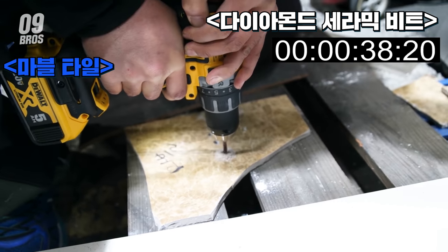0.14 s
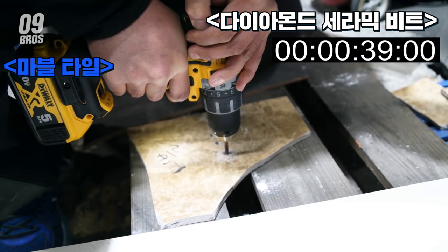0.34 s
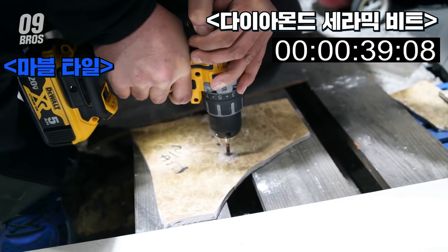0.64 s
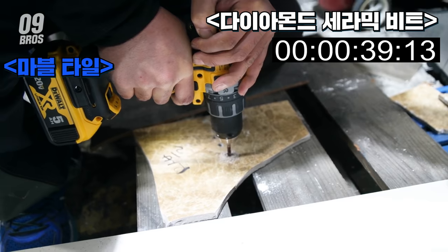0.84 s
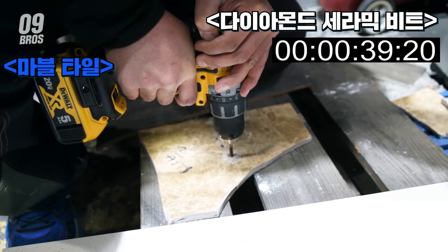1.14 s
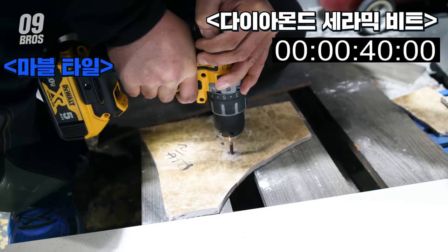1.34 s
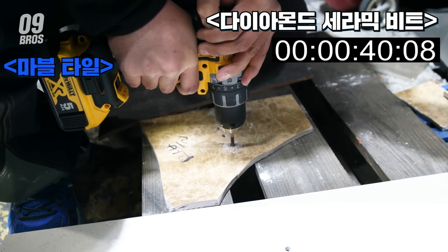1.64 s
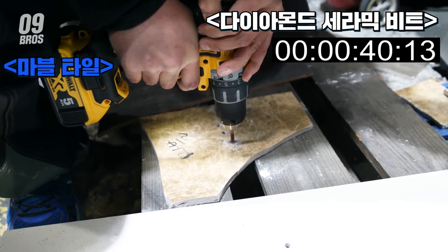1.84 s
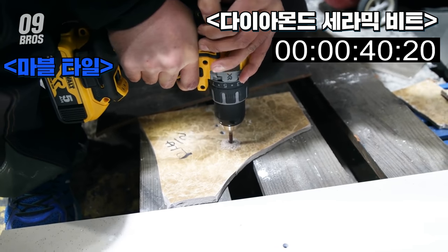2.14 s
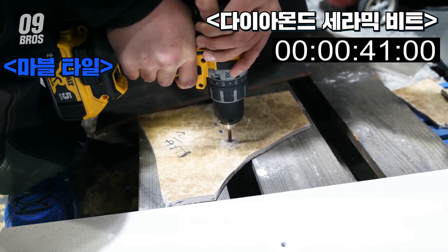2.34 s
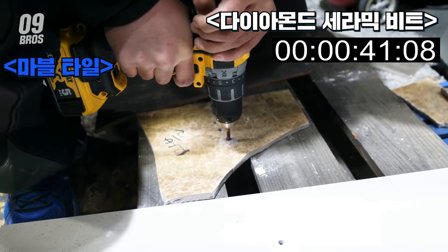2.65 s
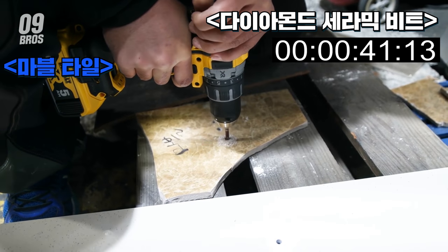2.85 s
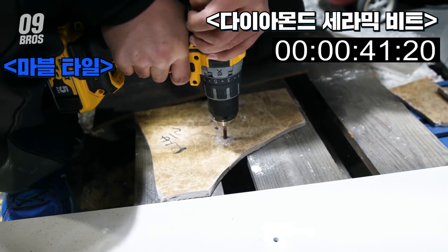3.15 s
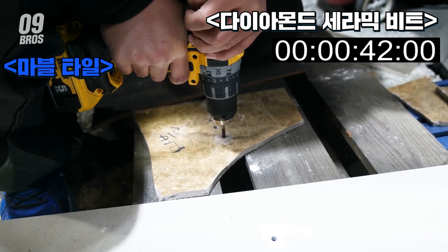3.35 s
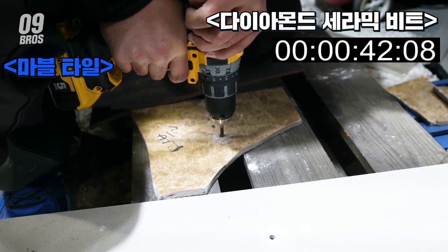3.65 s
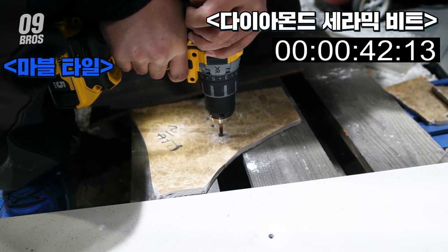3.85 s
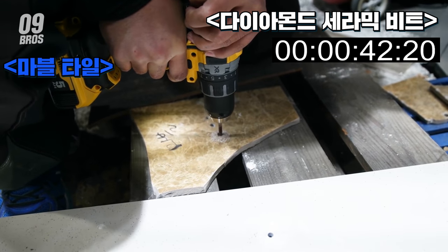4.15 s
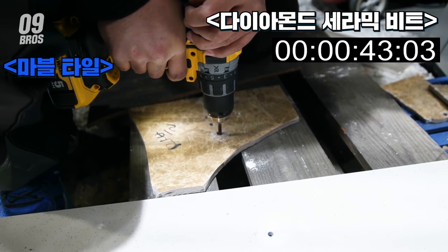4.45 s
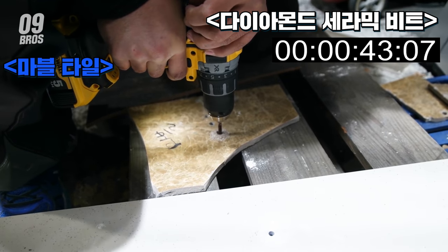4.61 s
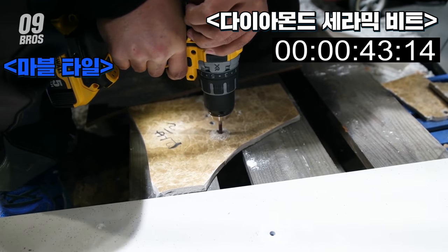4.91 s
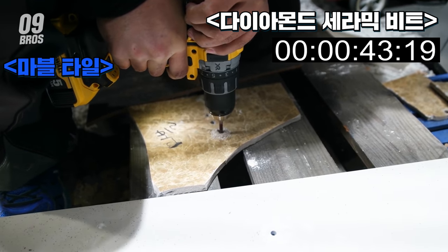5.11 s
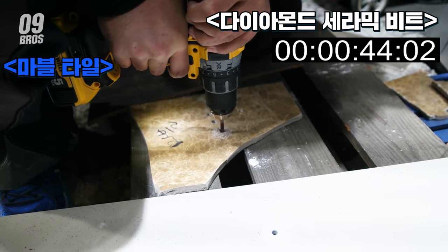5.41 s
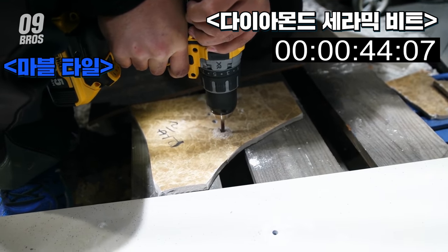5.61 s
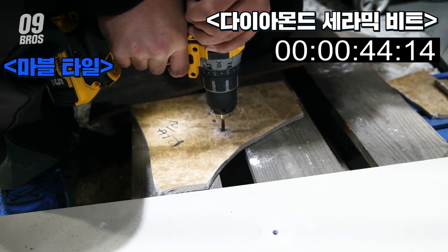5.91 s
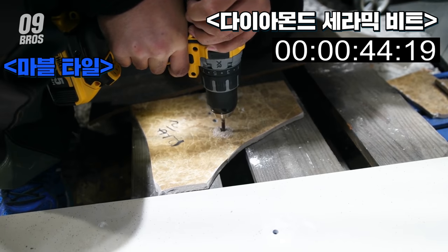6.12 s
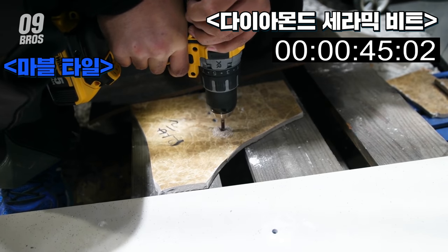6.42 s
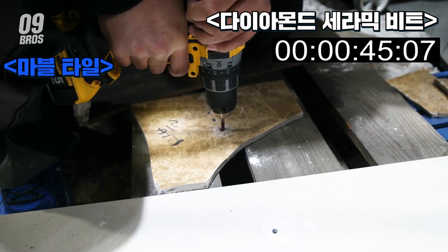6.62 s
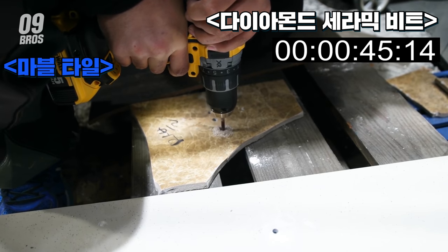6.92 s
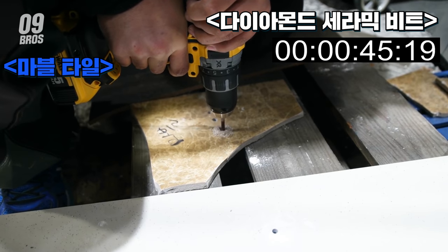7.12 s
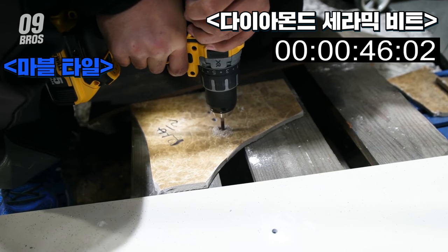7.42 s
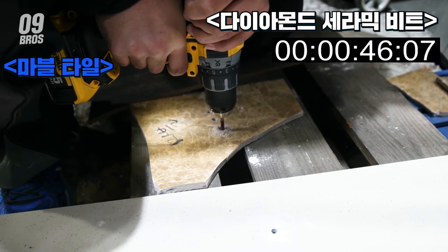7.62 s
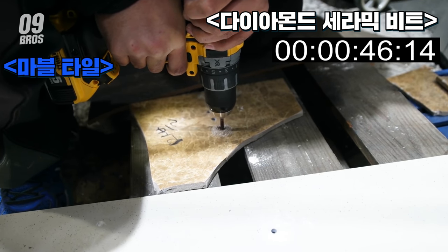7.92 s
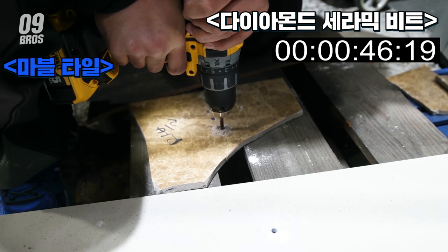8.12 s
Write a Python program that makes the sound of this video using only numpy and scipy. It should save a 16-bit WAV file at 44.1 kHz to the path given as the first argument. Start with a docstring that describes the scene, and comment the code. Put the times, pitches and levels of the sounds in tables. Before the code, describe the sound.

A cordless drill is already running at full speed close to the microphone and keeps going for the whole eight and a half seconds. Its motor and gears make a layered, quickly pulsing whine, while a diamond bit grinds marble tile with a dense, gritty hiss. From about 2 seconds the highest whine grows sharper. Between 2.6 and 3.2 seconds a strong draught hits the microphone with low rumbling and several thumps; the drilling ducks, then recovers with a slightly different, raspier tone. From about 3.7 to 4.8 seconds the whine warbles and chirps as the bit wobbles. The grinding dips slightly as the bit slips near 3.9, 4.4, 4.8 and 5.5 seconds. A softer gust rumbles around 5.2 seconds. The drilling then holds steady, with faint puffs of wind between 7 and 8 seconds and one last small dip near 8.2 seconds.

```python
"""A cordless drill at full speed grinds a small diamond core bit into a marble tile, close to one mic.
Motor and gears whine in shaft orders that sway with each chuck turn; grit and cooling air hiss through
the resonances of drill and tile. A hand shifts to the back of the drill and changes its colour; the bit
wobbles for a while and slips at times. A draught buffets the mic, whose gain ducks on overload."""
import sys
import numpy as np
from scipy.fft import rfft, irfft, next_fast_len
from scipy.io import wavfile
from scipy.ndimage import uniform_filter1d, minimum_filter1d, map_coordinates

SR = 44100
rng = np.random.default_rng(int(sys.argv[2]) if len(sys.argv) > 2 else 0)


def unload_wav(signal):
    """Save mono or channel-first audio to the path in sys.argv[1] as 16-bit WAV at rate SR, clipped to [-1, 1]."""
    wavfile.write(
        sys.argv[1],
        SR,
        np.round(np.clip(np.atleast_2d(signal).T, -1, 1) * 32767).astype(np.int16),
    )


N = 364442

# motor and gear tones, by hand position: shaft_order, beside_db, behind_db, throb_db
GEAR_TONES = [(2, -32, -24, 0), (2.204, -27, -20, 0), (3, -14.5, -16, 0), (3.527, -21, -21, 0),
              (4, -17, -19, 0), (10, -6, -4.3, -1), (16, -16, -10.5, 2)]
# grit and cooling air, hand beside / behind: freq_hz, relative_density_db
HISS_SPECTRUM_BESIDE = [(10, -45), (30, -17), (170, -18.0), (320, -6), (700, -5.5), (1400, -5),
                        (3000, -4.5), (4400, 0.5), (5400, -4.5), (9000, -7.5), (13300, -11.5),
                        (15000, -23.5)]
HISS_SPECTRUM_BEHIND = [(10, -45), (30, -20), (170, -22.3), (320, -11), (700, -10.5), (1400, -9),
                        (3000, -0.5), (4400, -5.5), (5400, -10), (9000, -9.5), (13300, -18.5),
                        (15000, -24.5)]
# resonances and notches of drill, tile and hands: centre_hz, width_hz, gain_db
RESONANCES_BESIDE = [(350, 40, -4.0), (390, 20, 5.0), (440, 20, 5.7), (470, 20, -5.0), (510, 20, 5.7),
                     (580, 40, -3.9), (690, 40, -5.0), (1040, 90, 2.3), (1580, 120, 4.0), (1790, 60, 4.9),
                     (1850, 460, 5.5), (1930, 140, -7.7), (2340, 120, -2.3), (2790, 600, 7.4),
                     (4300, 300, -4.3), (5220, 170, -2.3), (6320, 600, -3.6), (6730, 180, 3.4),
                     (7730, 260, -2.9), (8780, 290, -3.6), (9220, 170, -2.9), (9930, 340, 2.1),
                     (10750, 220, -2.9), (11720, 600, -2.5), (12800, 300, -3.6)]
RESONANCES_BEHIND = [(310, 20, 4.2), (400, 20, 3.3), (440, 30, 7.6), (510, 30, 6.4), (640, 40, 2.9),
                     (870, 90, 2.7), (1090, 160, 2.7), (1560, 90, 3.7), (1770, 240, 5.5), (2390, 600, -6.0),
                     (2410, 100, -6.0), (2960, 120, -5.7), (3290, 170, -4.0), (4310, 110, 2.7),
                     (4960, 180, -4.2), (7140, 170, -6.2), (7320, 110, 2.2), (7850, 160, 2.0),
                     (8530, 490, -7.1), (9410, 600, -5.4), (10040, 150, -3.6), (10380, 130, 2.7),
                     (10760, 480, -2.6), (12250, 410, 3.8), (13250, 600, 4.8)]
# gentle / strong draught: freq_hz, relative_density_db
EDDY_SPECTRUM = [(12, -35), (30, -7), (60, 1.5), (100, -0.5), (140, -9), (200, -20), (400, -40), (900, -70)]
FLUTTER_SPECTRUM = [(15, -40), (40, -14), (70, -4.5), (120, -2), (200, -8), (320, -14.5), (500, -22.5),
                    (900, -33), (2500, -85)]
# gusts of the draught: peak_s, flow_db, half_width_s
DRAUGHT_GUSTS = [(1.1, -42, .3), (2.44, -29, .025), (2.58, -19.5, .08), (2.93, -8.3, .28), (3.45, -31, .05),
                 (4.72, -26.5, .12), (5.22, -21, .43), (5.28, -17.5, .11), (5.6, -25.5, .11),
                 (6.91, -29, .07), (7.33, -31.5, .34), (7.83, -23, 0.1)]
# hardest eddies on the mic: start_s, envelope_peak_db, pitch_hz
MIC_BUFFETS = [(2.598, -10, 90), (2.626, -1, 190), (2.648, 7, 90), (2.776, 8.5, 130), (2.818, 11, 110),
               (2.875, 10, 190), (3.01, 5.5, 110)]
# bit loses some bite: start_s, length_s, drop_db
BIT_SLIPS = [(3.89, 0.19, 2.7), (4.4, .26, 2.6), (4.74, .48, 3.0), (5.46, .08, 3.2), (8.172, .1, 3)]
# hand loosens, lifts off the gearbox, lands behind the motor, presses: start_s, length_s
LOOSEN, LIFT, LAND, PRESS = (1.68, .3), (2.02, .44), (2.6, .22), (3.44, .89)


def amp(db):
    """Decibels to gain."""
    return 10 ** (np.asarray(db) / 20)


def unit(x):
    """Scale to rms 1."""
    return x / np.sqrt(np.mean(x ** 2) + 1e-20)


def ramp(start_s, length_s):
    """Linear rise from 0 to 1."""
    return np.clip((np.arange(N) / SR - start_s) / length_s, 0, 1)


def swell(peak_s, half_width_s):
    """Bell in time, peak 1."""
    return np.exp(-((np.arange(N) / SR - peak_s) / half_width_s) ** 2)


def drift(rate_hz):
    """Smooth random curve, knots at rate_hz."""
    knots = rng.standard_normal(8192)
    return map_coordinates(knots, [np.arange(N) * rate_hz / SR], mode="mirror")


def filtered(x, response):
    """Zero-phase filter with gain response(hz)."""
    size = next_fast_len(N + SR // 4)
    return irfft(rfft(x, size) * response(np.fft.rfftfreq(size, 1 / SR)), size)[..., :N]


def coloured(x, spectrum, resonances=()):
    """Broad spectrum plus bell-shaped peaks and notches; output rms 1."""
    def response(hz):
        freq_hz, density_db = np.transpose(spectrum)
        broad_db = np.interp(np.log(hz + 1), np.log(freq_hz + 1), density_db)
        bells_db = sum(db * .5 ** ((2 * (hz - centre) / width) ** 2) for centre, width, db in resonances)
        return amp(broad_db + bells_db)
    return unit(filtered(x, response))


def tone(angle_rad, rough):
    """Partial of rms 1; gear play shakes its level and phase."""
    return unit((1 + rough * drift(120)) * np.sin(angle_rad + rough * drift(120)))


def rotation(wobble, shaft_hz=410.3, gear_ratio=42, true_sway=.0039, wobble_sway=.0024):
    """Shaft and chuck angles in rad; the bit binds once a turn and slows the motor slightly."""
    chuck = 2 * np.pi * (np.arange(N) / SR * shaft_hz / gear_ratio - .17) + .15 * drift(6)
    sway = true_sway + wobble_sway * wobble
    speed_hz = shaft_hz * (1 + sway * np.cos(chuck) + .0009 * drift(90))
    return 2 * np.pi * np.cumsum(speed_hz) / SR, chuck


def hum(shaft, chuck, behind, slip_db, beside_db=-23.8, lift_db=-10, behind_db=-21.5, press_db=2.4):
    """Rotor unbalance shakes the housing, loudest under the palm; sags once per chuck turn."""
    before_db = beside_db + lift_db * ramp(*LIFT) ** 2
    landed_db = behind_db + press_db * ramp(*PRESS)
    hand_db = (1 - behind) * before_db + behind * landed_db
    throb_db = -1.5 * np.sin(chuck) + .3 * np.cos(2 * chuck) + 1.2 * drift(15) + .7 * drift(4)
    return amp(hand_db - .6 * slip_db + throb_db) * tone(shaft, rough=.088)


def whine(shaft, chuck, behind, slip_db, wobble, order=23,
          beside_db=-22.8, loosen_db=-3, lift_db=10, behind_db=-20.3, press_db=-6.3):
    """High motor tone: escapes as the hand lifts, smothered as it presses, chirps as the bit wobbles."""
    before_db = beside_db + loosen_db * ramp(*LOOSEN) + lift_db * np.sqrt(ramp(*LIFT))
    landed_db = behind_db + press_db * ramp(*PRESS)
    hand_db = (1 - behind) * before_db + behind * landed_db
    rocking = behind * (1 - ramp(*PRESS))  # until the palm steadies the drill
    once_db = 3.5 * wobble - 3 * rocking - 1
    twice_db = 5.8 * wobble - .5
    throb = amp(once_db * np.cos(chuck) + twice_db * np.cos(2 * chuck) + 1.2 * drift(25))
    throb /= np.sqrt(uniform_filter1d(throb ** 2, size=SR // 5))
    return amp(hand_db - 1.3 * slip_db) * throb * tone(order * shaft, rough=.16)


def gears(shaft, chuck, behind, load_db):
    """Gear tones follow the load; hand position sets their balance."""
    sound = np.zeros(N)
    for order, beside_db, behind_db, throb_db in GEAR_TONES:
        hand_db = (1 - behind) * beside_db + behind * behind_db
        order_db = hand_db + throb_db * np.cos(chuck) + .73 * drift(18)
        sound += amp(order_db) * tone(order * shaft, rough=.24)
    return amp(load_db) * sound


def gear_ring(shaft, order=8, beside_db=-29.2, loosen_db=6.2, behind_db=-38.5, damp_s=.15):
    """One gear tone rings out as the hand loosens, until the landed palm damps it."""
    damped = ramp(sum(LAND), damp_s)
    gain = (1 - damped) * amp(beside_db + loosen_db * ramp(*LOOSEN)) + damped * amp(behind_db)
    return gain * amp(drift(16)) * tone(order * shaft, rough=.12)


def grit(shaft, chips_per_s=6000, chip_share=.22):
    """Diamond grains chip the stone at random; cooling air pulses faintly with the shaft."""
    chips = (rng.random(N) < chips_per_s / SR) * rng.standard_normal(N)
    air = rng.standard_normal(N) * (1 + .04 * np.cos(shaft))
    return np.sqrt(chip_share) * unit(chips) + np.sqrt(1 - chip_share) * air


def grinding(shaft, chuck, behind, load_db, slip_db, beside_db=5, behind_db=5.5, split_hz=4400):
    """Grit sounds through drill and tile, coloured by the hand; slips cut the hiss more than the body."""
    scrape = grit(shaft)
    hand_beside = amp(beside_db) * coloured(scrape, HISS_SPECTRUM_BESIDE, RESONANCES_BESIDE)
    hand_behind = amp(behind_db) * coloured(scrape, HISS_SPECTRUM_BEHIND, RESONANCES_BEHIND)
    sound = (1 - behind) * hand_beside + behind * hand_behind
    body = filtered(sound, lambda hz: 1 / (1 + (hz / split_hz) ** 8))
    hiss = sound - body
    body_db = .6 + .6 * ramp(*PRESS) + .2 * slip_db
    # bit rubs harder once and twice per turn
    rub_db = .5 * (1 - behind) * np.cos(chuck) - .3 * np.cos(2 * chuck) + .22 * drift(30)
    hiss_db = .17 * np.cos(chuck) + .44 * drift(34)
    return amp(load_db) * (amp(body_db + rub_db) * body + amp(hiss_db) * hiss)


def draught(calm_db=-50, eddy_db=-2.6, flutter_db=1.5, strong_db=-22.5, blend_db=3.2,
            tear_db=8, tear_hz=260):
    """Gusts tumble over the mic; with rising flow, slow eddies give way to ever brighter flutter."""
    gust_power = sum((amp(db) * swell(peak_s, width_s)) ** 2 for peak_s, db, width_s in DRAUGHT_GUSTS)
    flow_db = 10 * np.log10(amp(calm_db) ** 2 + gust_power)
    strong = 1 / (1 + np.exp((strong_db - flow_db) / blend_db))
    eddies = amp(eddy_db) * coloured(rng.standard_normal(N), EDDY_SPECTRUM)
    flutter = amp(flutter_db) * coloured(rng.standard_normal(N), FLUTTER_SPECTRUM)
    tearing = amp(flow_db + tear_db) * filtered(flutter, lambda hz: 1 - 1 / (1 + (hz / tear_hz) ** 4))
    turbulence = np.sqrt(1 - strong) * eddies + np.sqrt(strong) * (flutter + tearing)
    return amp(flow_db + 1.5 * drift(30)) * turbulence


def buffets(rise_s=.004):
    """Single strong eddies push the diaphragm through a cycle or two."""
    sound = np.zeros(N)
    age_s = np.arange(SR // 10) / SR
    envelope = age_s / rise_s * np.exp(1 - age_s / rise_s)
    for start_s, peak_db, pitch_hz in MIC_BUFFETS:
        push = amp(peak_db) * envelope * np.sin(2 * np.pi * pitch_hz * age_s)
        sound[round(start_s * SR):][:len(push)] += push
    return sound


def ducked(x, bass_hz=400, threshold_db=-.2, recovery_db_per_s=21):
    """Gain control: bass overload turns everything down at once; the gain creeps back."""
    bass = filtered(x.mean(axis=0), lambda hz: 1 / (1 + (hz / bass_hz) ** 4))
    over_db = np.maximum(20 * np.log10(np.abs(bass) + 1e-9) - threshold_db, 0)
    regained_db = recovery_db_per_s * np.arange(N) / SR
    cut_db = np.maximum.accumulate(over_db + regained_db) - regained_db
    return x * amp(uniform_filter1d(minimum_filter1d(-cut_db, size=301), size=301))


def limited(x):
    """Fast limiter: holds peaks at full scale."""
    needed_gain = 1 / np.maximum(np.abs(x).max(axis=0), 1)
    return x * uniform_filter1d(minimum_filter1d(needed_gain, size=301), size=301)


def slipping(attack_s=.041, release_s=.13):
    """Bite lost, in dB: the bit slips quickly and takes hold more slowly."""
    return sum(drop_db * (ramp(start_s, attack_s) - ramp(start_s + length_s, release_s))
               for start_s, length_s, drop_db in BIT_SLIPS)


def scene(base_db=-17.7, loosen_db=.9, press_db=-1.1):
    """Drill and draught at one mic; both channels alike."""
    behind = ramp(*LAND)  # 0 hand beside, 1 hand behind
    slip_db = slipping()
    wobble = swell(peak_s=4.23, half_width_s=.54)  # bit askew in its hole
    shaft, chuck = rotation(wobble)
    load_db = base_db + loosen_db * ramp(*LOOSEN) + press_db * ramp(*PRESS) - slip_db
    motor = hum(shaft, chuck, behind, slip_db) + whine(shaft, chuck, behind, slip_db, wobble)
    gearbox = gears(shaft, chuck, behind, load_db) + gear_ring(shaft)
    mono = motor + gearbox + grinding(shaft, chuck, behind, load_db, slip_db) + draught() + buffets()
    return np.array([mono, mono])


def record(dry, top_hz=15200):
    """Gain control, limiter, steep low-pass."""
    return filtered(limited(ducked(dry)), lambda hz: 1 / np.sqrt(1 + (hz / top_hz) ** 300))


dry = scene()
out = record(dry)
unload_wav(out)
```